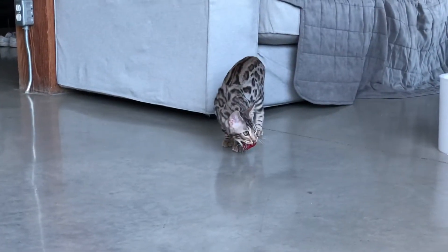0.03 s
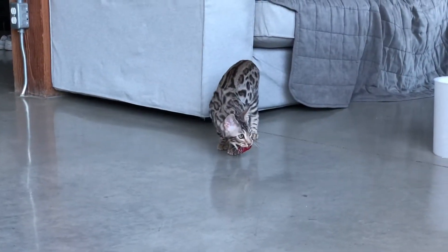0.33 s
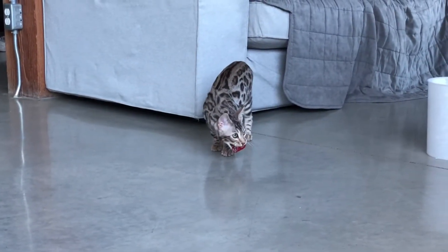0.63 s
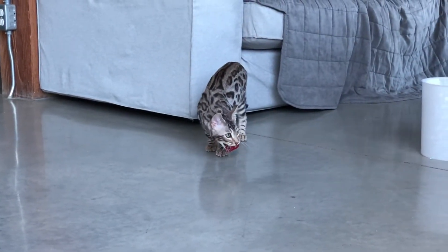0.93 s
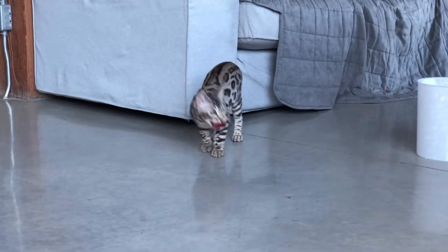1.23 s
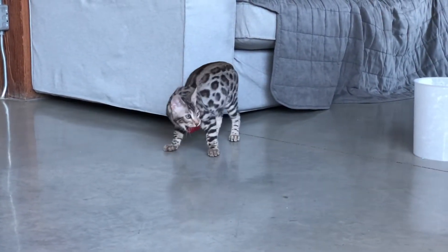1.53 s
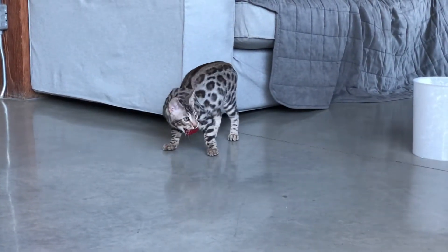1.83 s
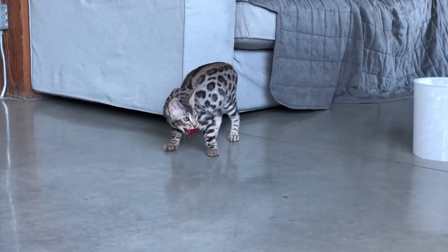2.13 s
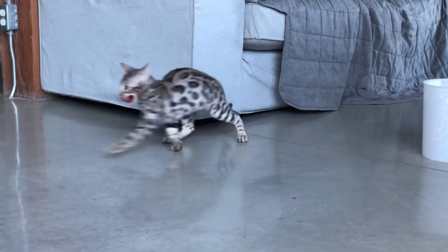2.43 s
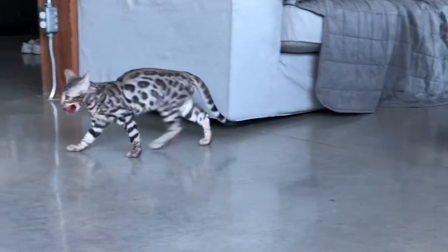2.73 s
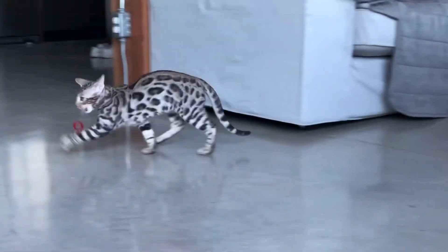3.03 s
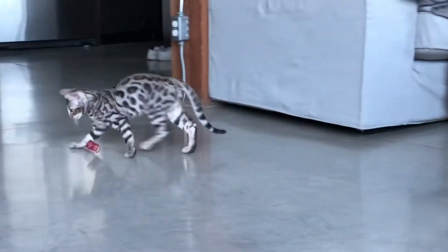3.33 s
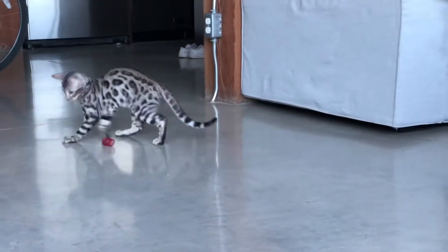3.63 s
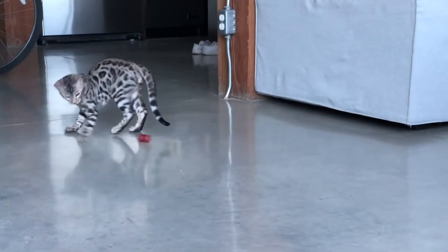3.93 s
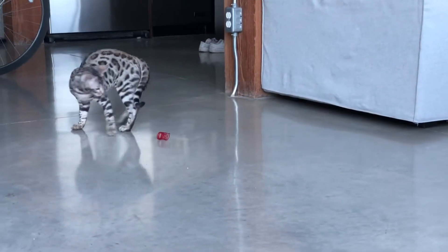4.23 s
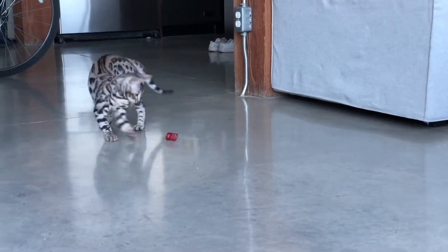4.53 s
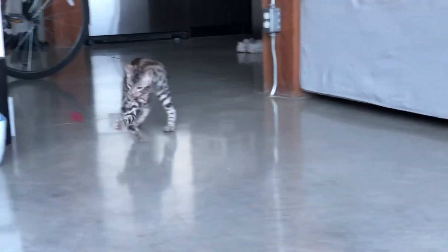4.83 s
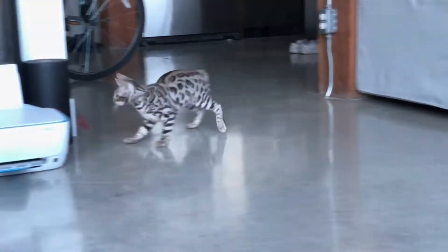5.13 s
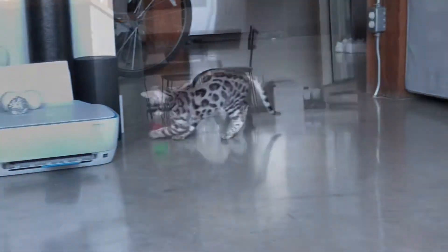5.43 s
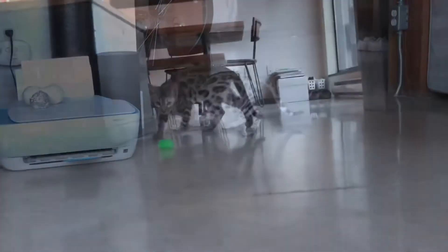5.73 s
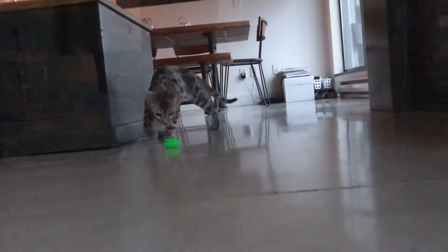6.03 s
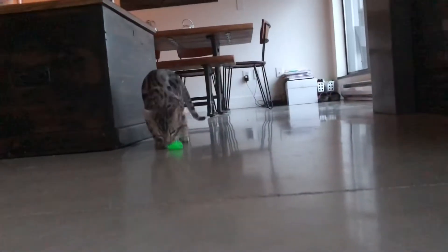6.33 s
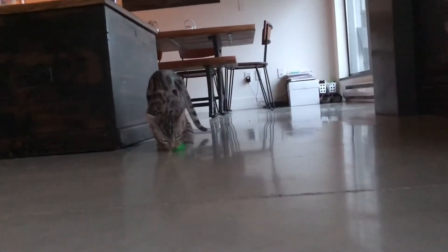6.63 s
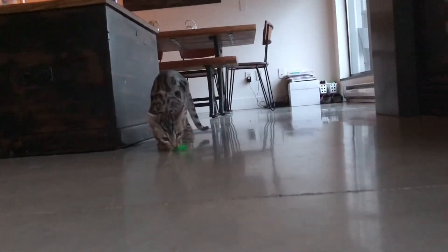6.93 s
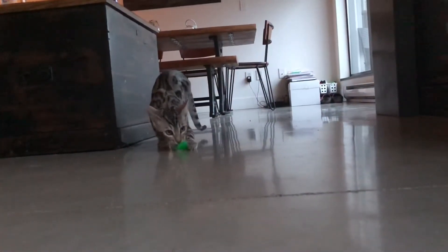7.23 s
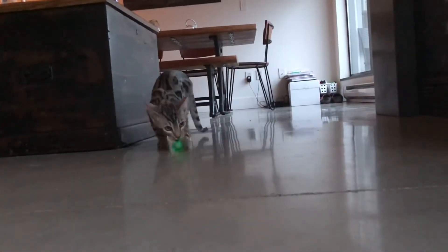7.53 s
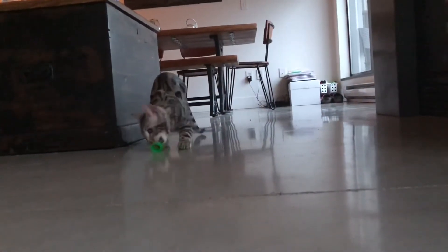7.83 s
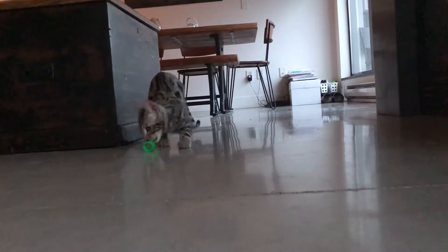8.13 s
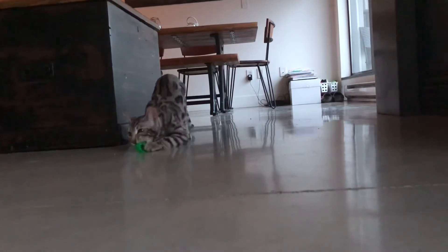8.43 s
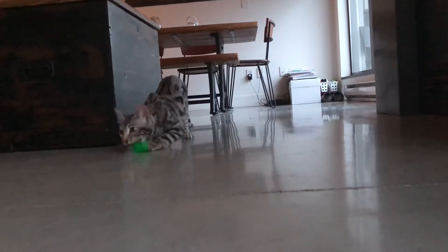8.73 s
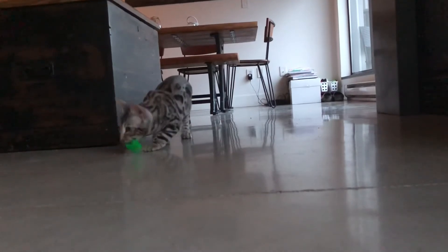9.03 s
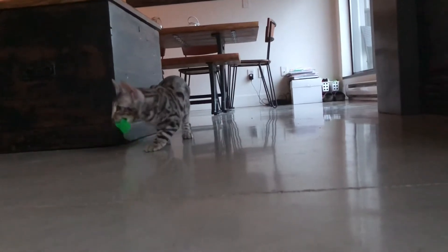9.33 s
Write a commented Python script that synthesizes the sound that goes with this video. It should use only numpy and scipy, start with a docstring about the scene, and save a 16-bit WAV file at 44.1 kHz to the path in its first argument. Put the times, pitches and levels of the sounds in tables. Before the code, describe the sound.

A kitten growls faintly and bats a small plastic toy across a hard floor into ringing furniture, then nibbles it and growls again.

```python
"""Kitten on a concrete floor

One microphone in a large, live room, quiet ventilation behind. A kitten growls faintly, its slow vocal
folds giving a chest tone and a rasp. It drops a small plastic toy, taps it about and bats it hard into
furniture, which rings. An appliance hum comes up; the kitten nibbles and paws at a toy and growls again."""
import sys
import numpy as np
from scipy import signal
from scipy.fft import rfft, irfft, next_fast_len
from scipy.io import wavfile
from scipy.ndimage import map_coordinates

SR = 44100
rng = np.random.default_rng(int(sys.argv[2]) if len(sys.argv) > 2 else 0)


def transcribe(u):
    """Save the signal u as a 16-bit wav file named by the first command-line argument.

    u: samples, shape (n,) or (channels, n), limited to [-1, 1]; the rate is SR.
    q: integer samples, one column per channel.
    """
    v = np.clip(np.atleast_2d(u).T, -1, 1)
    q = np.round(v * 32767).astype(np.int16)
    wavfile.write(sys.argv[1], SR, q)


N = 414540

# reverberation of the bare room: (frequency [Hz], t60 [s])
ROOM_DECAY = [(150, 0.45), (600, 0.81), (1500, 0.71), (4000, 0.84), (7500, 0.59), (11000, 0.36),
              (15000, 0.32)]
# room tone by the sofa and by the appliance: (frequency [Hz], level [dB])
SOFA_AIR = [(25, -37.5), (45, -8), (85, -5), (120, -1.5), (160, -10), (195, -4.5), (300, -11.5), (400, -9),
            (610, -17), (780, -19), (2030, -30), (8970, -35.5), (15800, -42.5)]
APPLIANCE_AIR = [(25, -35), (50, -1), (110, -6), (175, -3), (250, -10), (320, -8), (500, -13.5),
                 (1000, -17), (1550, -21), (2890, -35), (9720, -44), (15800, -50)]
# their balance at the microphone: (time [s], sofa [dB], appliance [dB])
AIR_LEVELS = [(0, -63.5, -100), (4.9, -64, -90), (5.3, -65, -66), (5.65, -71, -60.5), (6.05, -79, -55.5),
              (9.4, -89, -54.5)]
# growls, pitch and levels at full effort:
# (start [s], end [s], swell [s], third harmonic [Hz], chest [dB], rasp [dB])
GROWLS = [(-.1, 1.19, 0.11, 189.2, -60.8, -69), (8.5, 9.45, .42, 194, -53.3, -69.3)]
# throat and mouth resonances of each growl: (frequency [Hz], width [Hz], level [dB])
FIRST_THROAT = [(565, 400, -1), (1255, 150, 1), (1655, 310, -0.5), (2880, 500, -4), (3700, 300, -10),
                (4140, 520, 0)]
SECOND_THROAT = [(1590, 550, -5), (2650, 1300, -2.5), (4190, 250, 4.5), (6900, 1200, -9)]
# chest tone of each growl: (harmonic [number], level [dB])
FIRST_CHEST = [(2, -14.5), (3, -4), (4, -16.5), (5, -18)]
SECOND_CHEST = [(1, -9.5), (2, -5), (3, -1), (5, -14.5)]
# mouth shape: (time [s], scale of its resonances [ratio])
MOUTH_SHAPE = [(1.3, 1), (8.4, 1.15), (8.62, 1.04), (8.74, 1.24), (8.82, 1.07), (9.3, .98)]
# the toy hops on the floor: (time [s], level [dB], brightness [dB/octave], length [s])
TAPS = [(3.095, -55.5, -2.5, .013), (3.148, -47.5, 3.5, .038), (3.2835, -45.5, 4.5, .011),
        (3.326, -57, 7, .03), (3.4385, -39.5, 3.5, .008), (4.461, -62, -5, .065), (4.716, -44.5, 0, .019),
        (5.216, -42, 5, .02), (5.543, -53, 8, .02), (7.525, -49.5, 0.5, .024)]
# spectrum of the plastic toy: (frequency [Hz], level [dB])
TOY_COLOUR = [(500, -22.5), (1700, -9), (2450, -1), (3400, -6.5), (5800, -4), (6900, 0), (7600, -3),
              (8300, -3), (10500, -7), (12800, -3.5), (16000, -11)]
# its resonances: (frequency [Hz], half-width [Hz], lift [dB])
TOY_RESONANCES = [(2500, 120, 2), (6780, 200, 4), (8320, 200, 5), (12650, 350, 5)]
# contacts of the hard hit: (time [s], level [dB], length [s])
CRASH_CONTACTS = [(4.9482, -21, 0.0044), (4.9495, -11.5, .022), (4.957, -26.5, 0.025)]
# their spectrum: (frequency [Hz], level [dB])
CRASH_COLOUR = [(120, -37), (220, -7.5), (340, -14.5), (520, -8.5), (680, -3), (820, -9.5), (1000, -7),
                (2200, -7), (2850, -0.5), (4200, -2), (5500, -4.5), (6900, -0.5), (8600, -6), (15500, -7.5)]
# blows that set the furniture ringing: (time [s], level [dB], treble cutoff [Hz])
BLOWS = [(4.9494, -39, 20000), (5.1, -46, 1500)]
# modes of the furniture: (frequency [Hz], level [dB], t60 [s])
FURNITURE_MODES = [(221, -10, .7), (538, -14, .7), (672, -2, .4), (692, -4, .35), (1380, -8, .9),
                   (1580, -8, 1.0), (2538, -9, .4), (2806, -5, .35), (3006, -3, .45), (3092, -3, .8),
                   (3370, -2, .4), (3510, -6, .35), (3742, -6, .35), (4184, 0, .35), (4231, -5, .6),
                   (4570, -5, .45), (5336, -9, .4), (6352, -6, .3), (7274, -4, .35), (7771, -7, .3),
                   (9636, -8, .3), (10890, -9, .25), (15187, -9, .2)]
# the dull body of the hit, then the knocks that follow: (time [s], level [dB], centre [Hz], length [s])
KNOCKS = [(4.953, -25, 950, 0.021), (5.098, -33, 1300, 0.019), (5.1, -29, 520, 0.018),
          (5.101, -38, 244, 0.036), (5.1105, -29, 1410, 0.017), (5.176, -39, 1430, .025)]
# paws and body: (time [s], level [dB], centre [Hz])
THUMPS = [(5.15, -52.5, 81), (5.7, -53, 189), (5.85, -47.5, 75), (6.11, -44, 100), (6.14, -43, 176),
          (6.84, -48.5, 80), (7.19, -45, 160), (7.8, -48, 70), (8.14, -44.5, 176)]
# claws tick twice on the floor, then teeth catch on the toy:
# (time [s], tick [dB], knock [dB], knock centre [Hz])
CLAW_AND_TOOTH_TICKS = [(5.4073, -60, -51, 4300), (5.5261, -64, -54, 6700), (6.2596, -61, -53, 4200),
                        (6.289, -57, -51, 2800), (6.5787, -51, -52, 2500), (7.0017, -50.5, -51.5, 3000),
                        (7.2436, -54, -64, 3000), (7.2995, -55, -60, 2800), (7.3412, -57, -42, 3000),
                        (7.436, -59, -74, 3000), (7.4672, -53.5, -70, 3000), (8.7727, -54, -62, 3000),
                        (8.816, -53.5, -55.5, 4000)]
# a claw drags over the toy: (time [s], level [dB], length [s])
SCRAPES = [(7.255, -52.5, .04), (8.174, -64, .1), (8.463, -59, 0.08), (8.485, -57, 0.028)]
# spells of chewing: (start [s], end [s], typical tick [dB])
CHEWING_SPELLS = [(6.3, 7.8, -68.5), (8.2, 8.85, -62)]


def amp(db):
    """Decibels to gain."""
    return 10 ** (np.asarray(db) / 20)


def unit(x):
    """Scale to rms 1."""
    return x / np.sqrt(np.mean(x ** 2) + 1e-20)


def along(points, hz):
    """Interpolate (frequency, value) points on a log axis."""
    freqs, values = np.transpose(points)
    return np.interp(np.log(hz + 1), np.log(freqs), values)


def curves(rows):
    """One value per sample for each column after the time."""
    times, *columns = np.transpose(rows)
    return [np.interp(np.arange(N) / SR, times, column) for column in columns]


def wobble(rate):
    """A smooth random curve, rate knots a second."""
    return map_coordinates(rng.standard_normal(int(N * rate / SR) + 4), [np.arange(N) * rate / SR])


def filtered(x, colour):
    """Filter x; colour gives dB for each frequency."""
    size = next_fast_len(len(x) + 8192)
    return irfft(rfft(x, size) * amp(colour(np.fft.rfftfreq(size, 1 / SR))), size)[:len(x)]


def noise(colour):
    """Coloured noise of rms 1."""
    return unit(filtered(rng.standard_normal(N), colour))


def room_tail(colour):
    """What bare floor and walls send back to the microphone, at energy 1; the treble dies first."""
    hz, t, spectra = signal.stft(rng.standard_normal(SR), SR, nperseg=256)
    decay = 1000 ** (-t / along(ROOM_DECAY, hz)[:, None])
    tail = signal.istft(spectra * decay, SR, nperseg=256)[1][:SR]
    tail = filtered(tail, colour) * (1 - np.exp(-np.arange(SR) / SR / .0013))
    return tail / np.linalg.norm(tail)


def burst(colour, length, wet_db):
    """One contact, its force down 60 dB after length seconds; more wet_db sounds farther off."""
    t = np.arange(SR) / SR
    force = 1000 ** (-t / length) * (1 - np.exp(-t * 20 / length))
    # minimum phase: the object rings only after it is touched
    cepstrum = irfft(np.log(amp(colour(np.fft.rfftfreq(SR, 1 / SR)))))
    response = np.exp(rfft(cepstrum * np.r_[1, np.full(SR // 2 - 1, 2), np.zeros(SR // 2)]))
    direct = irfft(rfft(force * rng.standard_normal(SR)) * response)
    return np.linalg.norm(force) * (direct / np.linalg.norm(direct) + amp(wet_db) * room_tail(colour))


def add(track, s, sound):
    """Mix a sound in at time s."""
    part = track[round(s * SR):][:len(sound)]
    part += sound[:len(part)]


def contacts(rows, skirt_db, depth_db, wet_db):
    """Short contacts, skirt_db down an octave off centre, over a broad click depth_db down."""
    out = np.zeros(N)
    for s, db, centre_hz, length in rows:
        colour = lambda hz: -np.minimum(skirt_db * np.log2((hz + 1) / centre_hz) ** 2, depth_db)
        add(out, s, amp(db) * burst(colour, length, wet_db))
    return out


def room_tone():
    """Quiet ventilation by the sofa gives way to the rush and mains hum of an appliance."""
    sofa_db, appliance_db = curves(AIR_LEVELS)
    hum = amp(-7 + 1.5 * wobble(5)) * np.sin(2 * np.pi * 59.5 * np.arange(N) / SR + .25 * wobble(4))
    ventilation = noise(lambda hz: along(SOFA_AIR, hz))
    rush = noise(lambda hz: along(APPLIANCE_AIR, hz))
    return amp(sofa_db) * ventilation + amp(appliance_db) * (rush + hum)


def growl(row, throat, chest, jitter, sharpness, breath, wet_db):
    """Slow vocal folds, faint at the microphone: a chest tone, and two rasping puffs a cycle."""
    start, end, swell_s, full_hz, full_chest_db, full_rasp_db = row
    attack_s, release_s = .35, .22  # from and to 60 dB down
    swell_db, hz_per_db, rasp_follow = 9, .6, .55
    t = np.arange(N) / SR
    voiced = amp(-60 * (np.maximum(start - t, 0) / attack_s + np.maximum(t - end, 0) / release_s))
    # the effort swells, then holds; pitch and both levels follow it
    effort_db = -swell_db * (1 - np.clip((t - start) / swell_s, 0, 1))
    pitch_hz = (full_hz + hz_per_db * effort_db) / 3
    rasp_db = full_rasp_db + rasp_follow * effort_db + 1.05 * wobble(8.7)
    phase = 2 * np.pi * np.cumsum(pitch_hz * (1 + .014 * wobble(45))) / SR
    tone = unit(sum(amp(db + 2.7 * wobble(40)) * np.sin(k * phase) for k, db in chest))
    puffs = np.exp(sharpness * (np.cos(2 * phase + jitter * wobble(120)) - 1))
    puffs *= amp(2 * wobble(120))

    def formants(f):
        power = sum(amp(2 * db) / (1 + ((f - hz) / width * 1.42) ** 2) ** 2 for hz, width, db in throat)
        return 10 * np.log10(1e-9 + power)

    # the resonances slide together as the lips draw back
    clock = np.cumsum(curves(MOUTH_SHAPE)[0])
    air = map_coordinates(noise(formants), [clock % (N - 1)])
    rasp = voiced * amp(rasp_db) * unit(air * (puffs + breath))
    echo = signal.fftconvolve(rasp, room_tail(np.zeros_like))[:N]
    return voiced * amp(full_chest_db + effort_db) * tone + rasp + amp(wet_db) * echo


def faint_tone(peak_s=2.2, length_s=.36, hz=605, db=-72):
    """A soft, nearly pure tone swells and fades in the background."""
    t = np.arange(N) / SR
    swell = np.exp(-((t - peak_s) / (length_s / 2)) ** 4)
    return amp(db) * swell * np.sin(2 * np.pi * hz * t + .5 * wobble(20))


def toy_taps():
    """Plastic ticks on concrete with plenty of room around them; harder corners sound brighter."""
    out = np.zeros(N)
    ring = lambda f: sum(db / (1 + ((f - hz) / width) ** 2) for hz, width, db in TOY_RESONANCES)
    for s, db, tilt_db, length in TAPS:
        colour = lambda hz: along(TOY_COLOUR, hz) + ring(hz) + tilt_db * np.log2(hz + 1)
        add(out, s, amp(db) * burst(colour, length, wet_db=-1))
    return out


def furniture_crash():
    """The batted toy cracks against furniture, which rings; the whole room answers the crack."""
    out, t = np.zeros(N), np.arange(SR) / SR
    for s, db, length in CRASH_CONTACTS:
        add(out, s, amp(db) * burst(lambda hz: along(CRASH_COLOUR, hz), length, wet_db=1))
    onset = 1 - np.exp(-t / .0005)
    for s, blow_db, cutoff_hz in BLOWS:
        for hz, db, t60 in FURNITURE_MODES:
            gain = amp(blow_db + db) / (1 + (hz / cutoff_hz) ** 6)  # a soft blow reaches only low modes
            mode = np.sin(2 * np.pi * hz * t + rng.uniform(0, 2 * np.pi)) * 1000 ** (-t / t60)
            add(out, s, gain * mode * onset)
    return out


def knocks():
    """The dull body of the hit, then the knocks that follow it, out in the room."""
    return contacts(KNOCKS, skirt_db=27, depth_db=54.5, wet_db=-2.5)


def paw_thumps(length_s=.2):
    """Paws and body land, close-sounding and low; a padded contact dies slowly."""
    return contacts([(s, db, hz, length_s) for s, db, hz in THUMPS], skirt_db=44, depth_db=68, wet_db=-14)


def claws_and_teeth(tick_hz, tick_s):
    """Claws tick on the floor, then teeth and claws catch on the toy: each a sharp tick and short knock."""
    knock_s, scrape_hz = .009, 2700
    tips = [(s, db, tick_hz, tick_s) for s, db, _, _ in CLAW_AND_TOOTH_TICKS]
    # a lighter tick comes just before; in a bite, this is the other jaw
    tips += [(s - .007, db - 8, tick_hz, tick_s) for s, db, _, _ in CLAW_AND_TOOTH_TICKS]
    tips += [(s, db - 4.5, tick_hz, length) for s, db, length in SCRAPES]
    bodies = [(s, db, hz, knock_s) for s, _, db, hz in CLAW_AND_TOOTH_TICKS]
    bodies += [(s, db, scrape_hz, length) for s, db, length in SCRAPES]
    ticks = contacts(tips, skirt_db=10, depth_db=26, wet_db=-10)
    return ticks + contacts(bodies, skirt_db=34, depth_db=33, wet_db=-8)


def chewing(tick_hz, tick_s, ticks_per_s=17, spread_db=2.5):
    """Faint ticks of the teeth at random moments, with little room on them."""
    ticks = []
    for start, end, db in CHEWING_SPELLS:
        for when, size in rng.random((int(ticks_per_s * (end - start)), 2)):
            ticks.append((start + when * (end - start), db + spread_db * (2 * size - 1), tick_hz, tick_s))
    return contacts(ticks, skirt_db=12, depth_db=28, wet_db=-10)


def scene():
    """Kitten, toy and room at one microphone; the second growl is drier and sounds nearer."""
    tick_hz, tick_s = 10000, .0085  # the hard tip of a tooth or claw
    growls = growl(GROWLS[0], FIRST_THROAT, FIRST_CHEST, jitter=.7, sharpness=1.7, breath=.28, wet_db=-3)
    growls += growl(GROWLS[1], SECOND_THROAT, SECOND_CHEST,
                    jitter=.3, sharpness=2.6, breath=.14, wet_db=-7)
    play = knocks() + paw_thumps() + toy_taps() + furniture_crash() + claws_and_teeth(tick_hz, tick_s)
    return (growls + play + room_tone() + chewing(tick_hz, tick_s) + faint_tone())[None]


def record(dry):
    """The recorder keeps nothing above its band limit."""
    top_hz = 15830
    lowpass = signal.firwin(201, top_hz, fs=SR, window="blackman")
    return signal.fftconvolve(dry, lowpass[None], mode="same", axes=1)


dry = scene()
out = record(dry)
transcribe(out)
```